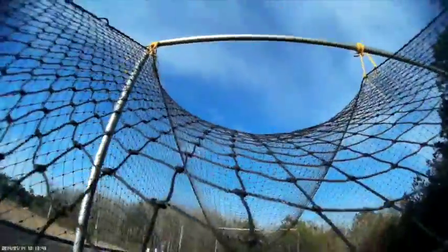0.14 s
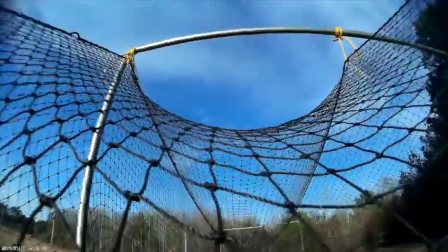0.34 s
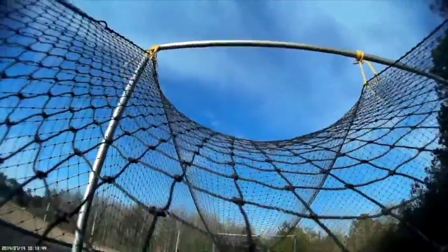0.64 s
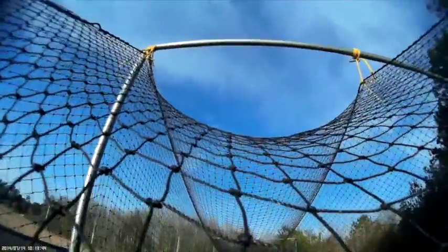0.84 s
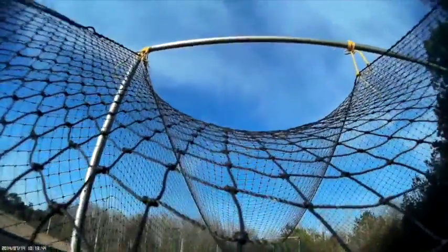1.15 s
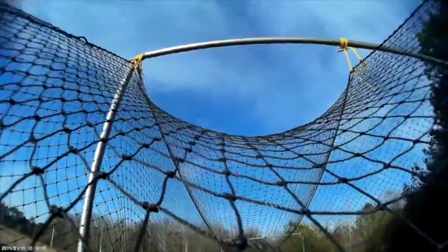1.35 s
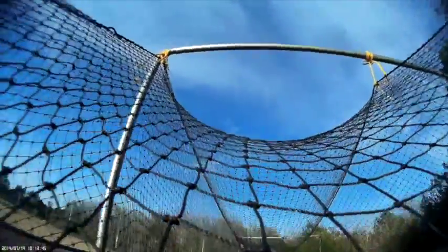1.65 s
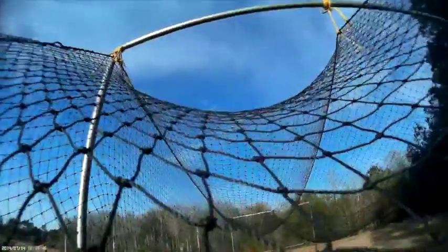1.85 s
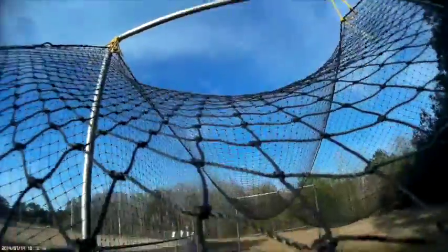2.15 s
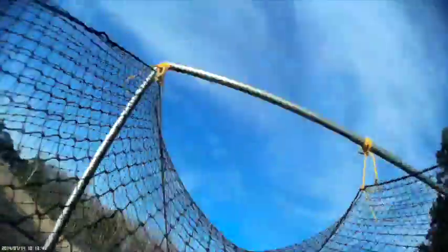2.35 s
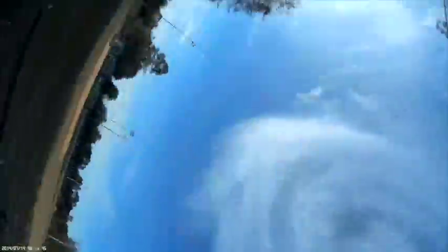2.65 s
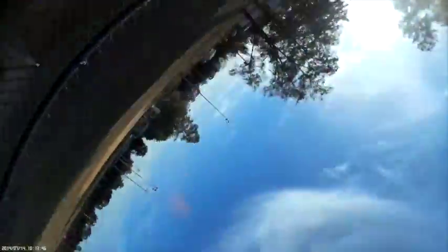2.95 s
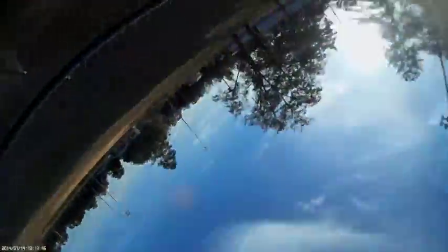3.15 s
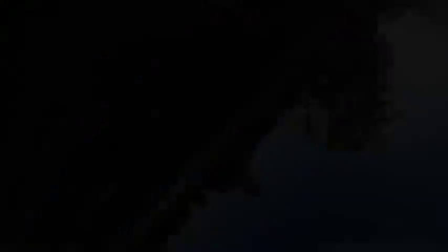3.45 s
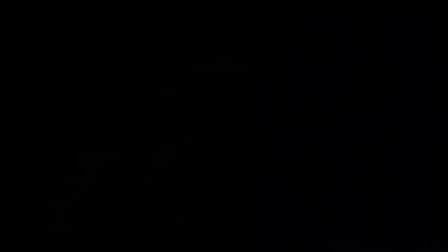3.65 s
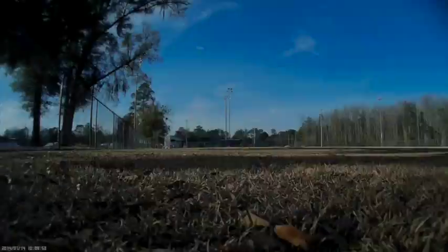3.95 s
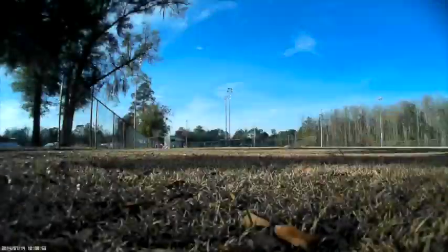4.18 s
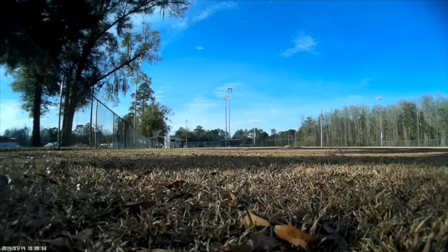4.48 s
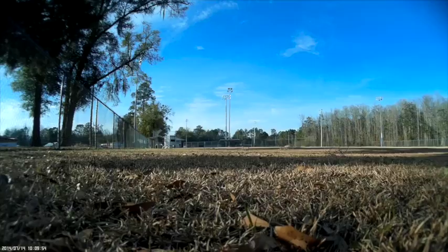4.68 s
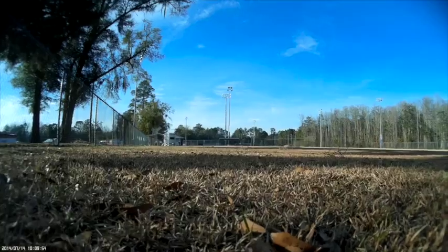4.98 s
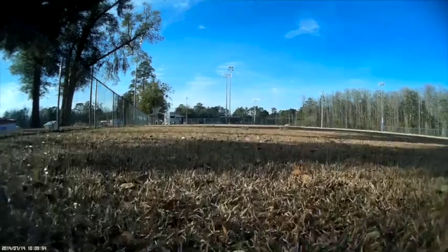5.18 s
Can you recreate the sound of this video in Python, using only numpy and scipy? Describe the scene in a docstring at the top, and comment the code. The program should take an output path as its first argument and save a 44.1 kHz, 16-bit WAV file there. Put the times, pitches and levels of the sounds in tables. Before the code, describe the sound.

Outdoors, heard from a microphone on a small drone: faint ticks and creaks on its frame, a quiet pause, then rough scraping, rattling and two very hard cracks as it is handled. Knocks thin out over wind and a distant low engine idle. Abruptly the motor controllers whistle with a stutter, and the propellers spin up into a beating buzz that is still climbing at the end.

```python
"""A small four-rotor drone with a camera, heard through the camera's microphone.
First it is fingered, scraped and knocked: noisy contact forces ring the modes of its frame, and rubs creak on
single resonances. Then a distant engine idles, pulses through a resonant pipe, with wind noise on the microphone.
Last the speed controllers whistle, a switching tone with sidebands, and the propellers spin up: two rotor pairs
whose blade tones beat, over overtones, hum, hiss and wash. Faint air noise lies under it all."""
import sys
import numpy as np
from scipy.fft import rfft, irfft, next_fast_len
from scipy.io import wavfile
from scipy.ndimage import map_coordinates

SR = 44100
rng = np.random.default_rng(int(sys.argv[2]) if len(sys.argv) > 2 else 0)


def materialize(psi):
    """Save the field psi as 16-bit PCM at rate SR to the path in sys.argv[1].

    A 1-D psi becomes a single channel; in a 2-D psi each row is a channel.
    """
    bounded = np.clip(np.atleast_2d(psi).T, -1, 1)
    quanta = np.round(bounded * 32767).astype(np.int16)
    wavfile.write(sys.argv[1], SR, quanta)


N = 234548

# scraping force, light until the frame is seized and tumbles:
# [t/s, relative pressure level/dB, relative treble grit level/dB]
SCRAPE_FORCE = [(0.0, -90, -106), (0.15, -72, -68.5), (0.4, -57, -67.5), (0.55, -66.5, -95),
                (0.88, -60.5, -69.5), (1.1, -60, -67), (1.69, -59.5, -70), (1.705, -38.5, -55),
                (2.0, -40.5, -48.5), (2.35, -42.5, -51.5), (2.47, -48.5, -53.5), (2.7, -39.5, -47),
                (3.03, -32.5, -54), (3.09, -36.5, -64), (3.3, -54, -70.5), (3.7, -50.5, -61.5),
                (4.1, -55, -67)]
ARMED = 4.476  # s, controllers switch on


def amp(db):
    """Decibel law: the amplitude gain of a level in dB."""
    return 10 ** (np.asarray(db) / 20)


def unit(x):
    """Normalization: x at rms 1."""
    return x / np.sqrt(np.mean(x ** 2) + 1e-20)


def curves(rows):
    """Linear interpolation in time: one value per sample for each column after the time."""
    s, *cols = np.transpose(rows)
    return [np.interp(np.arange(N) / SR, s, c) for c in cols]


def wobble(rate):
    """Band-limited fluctuation: a smooth random curve with rate knots a second."""
    knots = rng.standard_normal(int(N * rate / SR) + 4)
    return map_coordinates(knots, [np.arange(N) * rate / SR])


def filtered(x, response):
    """Linear filtering: the spectrum of x times a complex response of frequency."""
    m = next_fast_len(N + SR // 2)
    return irfft(rfft(x, m) * response(np.fft.rfftfreq(m, 1 / SR)), m)[..., :N]


def noise(spectrum):
    """Spectral shaping: white noise coloured by (f/Hz, level/dB) points, at rms 1."""
    f, db = np.transpose(spectrum)

    def colour(hz):
        return amp(np.interp(np.log(hz + 1), np.log(f + 1), db))

    return unit(filtered(rng.standard_normal(N), colour))


def gate(start, end, edge):
    """Linear envelope: up over edge seconds from start, down over edge seconds from end."""
    return np.interp(np.arange(N) / SR, [start, start + edge, end, end + edge], [0, 1, 1, 0])


def resonance(f, centre, width):
    """Damped oscillator: band-pass response with gain 1 at its centre."""
    return 1j * f * width / (centre * centre - f * f + 1j * f * width)


def frame(force, low_hz=None, high_hz=None, deep_db=-9):
    """Modal superposition: low, middle and high force parts ring modes, favoured near the two pitches."""
    # resonances of frame and camera shell: [f/Hz, width/Hz, relative level/dB]
    frame_modes = [(113, 120, -13.5), (220, 79, -9), (304, 15.5, -8), (824, 98.5, 0.5), (1269.5, 50.5, 1.5),
                   (1518, 94, 3.5), (1932, 510, -5.5), (2525, 72, -6), (2740, 99, -12.5), (3226, 240, -10),
                   (3750, 516, -12), (4563, 357, -10), (5600, 290, -15.5), (6064, 396, -18),
                   (7710, 240, -26), (9370, 360, -27.5), (12400, 180, -38), (12700, 570, -50.5)]
    m = next_fast_len(force.shape[1] + SR // 10)
    f = np.fft.rfftfreq(m, 1 / SR)
    centre, width, db = np.transpose(frame_modes)[:, :, None]
    db = db + deep_db * (centre < 260)  # the slow bending modes need a hard blow
    if low_hz:
        db = db + 9 * sum(np.exp(-(np.log(centre / hz) / 0.088) ** 2) for hz in (low_hz, high_hz))
    signs = (-1.) ** np.arange(len(centre))[:, None]
    modes = (signs * amp(db) * resonance(f, centre, width)).sum(0)
    low = 1 / (1 + 1j * f / 1000) ** 2
    middle = (1j * f / 1000) ** 2 * low / (1 + 1j * f / 3500) ** 2
    high = (1j * f / 3500 / (1 + 1j * f / 3500)) ** 3 / (1 + 1j * f / 11000) ** 2
    parts = modes * np.array([low, middle, high])
    parts = parts / np.sqrt(np.mean(np.abs(parts) ** 2, axis=1, keepdims=True))
    return irfft((rfft(force, m) * parts).sum(0), m)


def knocks():
    """Impact excitation: a crack and dying rattle of force; hard blows excite the deep modes more."""
    # knocks and ticks: [t/s, relative level/dB, relative thud level below 1 kHz/dB,
    # relative snap level above 3.5 kHz/dB, contact t60/s, most excited f/Hz]
    blows = [(0.1759, -51, 4, -6, 0.055, 1340), (0.3413, -27, -15, -3.5, 0.047, 1460),
             (0.379, -31.5, -12.5, -9.5, 0.044, 1740), (0.4923, -39, -18, -7.5, 0.04, 1530),
             (0.5156, -35.5, 0, -0.5, 0.033, 757), (0.7108, -44.5, -13, -5, 0.033, 614),
             (1.478, -48, -5, 6, 0.011, 796), (1.702, -29, -3, -2.5, 0.12, 1720),
             (1.7606, -20, -2, -4.5, 0.021, 1240), (1.8023, -13.5, -16.5, -6.5, 0.026, 825),
             (1.8356, -27.5, -18, -2.5, 0.044, 1400), (1.8562, -17.5, -19, -11.5, 0.026, 1470),
             (1.9038, -24, -19, -21.5, 0.014, 1530), (1.9953, -21.5, 0, -5, 0.075, 950),
             (2.0206, -25.5, -1, -8, 0.044, 820), (2.0624, -28.5, -6, -3.5, 0.06, 940),
             (2.173, -27.5, -13, -21.5, 0.011, 1430), (2.2047, -23.5, -14, -10.5, 0.042, 1360),
             (2.217, -27, -16.5, -4, 0.017, 840), (2.2562, -19, -39, -12.5, 0.03, 1270),
             (2.3248, -21, -11, -8, 0.17, 795), (2.3487, -20.5, -1, -22.5, 0.066, 1270),
             (2.3844, -21.5, -13, -7, 0.082, 724), (2.4209, -25.5, -30, -1, 0.022, 1830),
             (2.4417, -21.5, -12, -32.5, 0.013, 1370), (2.4853, -27.5, -5.5, -11, 0.077, 720),
             (2.5621, 1.5, -11, -2.5, 0.014, 1748), (2.565, -30.5, 11.5, -15, 0.052, 300.6),
             (2.6789, -23, -6, -11, 0.07, 790), (2.7616, -25, -14, -0.5, 0.029, 1730),
             (2.7789, -19, -23, -6, 0.15, 1660), (2.802, -8.5, -10.5, -9.5, 0.065, 840),
             (2.8175, -18.5, -5, -8.5, 0.14, 1090), (2.8973, 4, -10.5, -8.5, 0.032, 1590),
             (3.0767, -31, -0.5, 1, 0.02, 1670), (3.0879, -35, 11, 0, 0.034, 1100),
             (3.1642, -25, -35, -16.5, 0.039, 1570), (3.372, -45, -25, -13, 0.025, 1560),
             (3.4252, -45, 7, 6.5, 0.015, 950), (3.5024, -44, -2.5, -2, 0.15, 1530),
             (3.6026, -28.5, -11.5, -5.5, 0.089, 1200), (3.694, -30.5, -11, -11, 0.034, 1660),
             (3.8097, -24, -12.5, -5, 0.018, 1160), (3.8864, -19, -15, -3.5, 0.016, 1330),
             (3.9843, -37.5, -13, -25, 0.033, 1610)]
    out, t = np.zeros(N + SR), np.arange(SR // 8) / SR
    contacts = blows + patter()
    rattle = rng.standard_normal((len(contacts), len(t)))
    upper_hz = rng.uniform(2210, 4640, len(contacts))  # upper pitch that a contact favours
    for (s, db, thud_db, snap_db, t60, low_hz), high_hz, grit in zip(contacts, upper_hz, rattle):
        decay = amp(db - 60 * t / max(t60, .003))
        onset = 1 - np.exp(-t / (0.035 * t60))
        crack = 1 + 1.12 * np.exp(-t / 0.00064)
        force = grit * decay * onset * crack * amp([[thud_db + 8.5], [0], [snap_db + 1.5]])
        ring = frame(force, low_hz, high_hz, deep_db=0.67 * (db + thud_db) + 3.5)
        out[round(s * SR):][:len(ring)] += ring
    return out[:N]


def patter():
    """Random point process: small stray contacts that follow the scraping pressure, as rows for knocks."""
    # [level over the scraping pressure/dB, relative thud level/dB, relative snap level/dB, contact t60/s]
    stray_touch = (9.5, -11, -8.5, 0.1)
    span_s, per_s = 4, 8
    s, size, spot = rng.random((round(span_s * per_s), 3)).T
    s = span_s * s
    over_db, *touch = stray_touch
    db = curves(SCRAPE_FORCE)[0][(s * SR).astype(int)] + over_db + 8 * (size - .5)
    return [(a, b, *touch, 780 * 3.1 ** c) for a, b, c in zip(s, db, spot)]


def scraping():
    """Stick and slip: uneven clumps of grit, low and high parts loosely tied, with sparse treble ticks."""
    pressure_db, bright_db = curves(SCRAPE_FORCE)
    depth = np.clip((pressure_db + 75) / 25, .3, 1)  # a light touch slides smoothly
    shared = wobble(30) + 1.2 * wobble(14)
    clumps = [amp(depth * (2 * shared + 2 * wobble(45) + 4 * wobble(300))) for _ in range(3)]
    ticks = (rng.random(N) < 300 / SR) * rng.standard_normal(N)  # about 300 a second
    thud, rub = (unit(c * rng.standard_normal(N)) for c in clumps[:2])
    grit = unit(clumps[2] * (rng.standard_normal(N) + 14 * ticks))
    force = np.array([thud * amp(pressure_db), rub * amp(pressure_db - 20.0), grit * amp(bright_db)])
    return frame(force)[:N] * gate(-1, 3.983, 0.11)


def creaks():
    """Frictional resonance: a rub settles on one mode, narrow noise that swells quickly and rings out."""
    # creaks and squeaks: [start t/s, t of decay to 1/e/s, f/Hz, width/Hz, relative level/dB]
    squeaks = [(0.208, 0.238, 816, 80, -55), (0.35, 0.457, 1527, 50, -60), (0.446, 0.488, 800, 80, -53.5),
               (0.522, 0.561, 1543, 50, -50), (0.826, 0.89, 710, 80, -44.5),
               (0.82, 0.892, 1060, 130, -49.5), (0.921, 1.06, 730, 60, -62), (0.941, 1.1, 1186, 60, -59),
               (0.879, 1.175, 3760, 300, -68), (1.578, 1.69, 3880, 400, -66),
               (0.827, 0.923, 5800, 300, -68), (1.757, 1.778, 2702, 30, -43),
               (1.99, 2.033, 2710, 30, -48.5), (2.947, 3.036, 4540, 180, -43),
               (3.083, 3.1, 4395, 150, -28.5), (3.095, 3.12, 2700, 30, -59), (3.494, 3.521, 4450, 150, -49),
               (3.506, 3.53, 6060, 200, -61)]
    out = np.zeros(N + SR)
    for start, end, hz, width, db in squeaks:
        m = next_fast_len(round(3 * (end - start) * SR))
        f = np.fft.rfftfreq(m, 1 / SR)
        u = np.arange(m) / SR / (end - start)
        band = (1 + ((f - hz) / (width / 2)) ** 2) ** -.85
        tone = unit(irfft(rfft(rng.standard_normal(m)) * band, m))
        swell = (1 - np.exp(-(u / 0.34) ** 2)) * np.exp(-u ** 2)
        out[round(start * SR):][:m] += amp(db + 4.5) * tone * swell
    return out[:N]


def motors():
    """Beats and modulation: rotor pairs of unequal phase, a switching tone with sidebands, hiss and wash."""
    # rotors: [t/s, blade rate f/Hz, lead of the far pair over the near/blade passes]
    rotors = [(4.48, 0, -1.5), (4.53, 56, -1), (4.6, 103, -0.5), (4.65, 151, 0.1), (4.7, 196, 0.5),
              (4.785, 234, 1.5), (4.866, 247.5, 2.5), (4.94, 256.5, 3), (5.04, 270, 3.5),
              (5.11, 297.5, 3.5), (5.155, 314, 4), (5.19, 312, 4), (5.25, 337, 4), (5.319, 350, 4)]
    # blade overtones: [multiple of blade rate, relative level/dB]
    overtones = [(3, -8), (4, -11.5), (5, -13.5), (6, -16), (7, -20), (8, -30)]
    # commutation lines: [multiple of switching rate, multiple of blade rate]
    sidebands = [(1, 6), (1, 21), (1, -21), (0, 21), (2, -21), (1, 10.5), (0, 13)]
    # the same lines, ahead of the shell's response: [relative level/dB, level change/(dB/s)]
    sideband_levels = [(-28, -59), (-39.5, -3.5), (-36.5, -48), (-46.5, 6.5), (-39, -39), (-41.5, -16),
                       (-43, 1)]
    # hum of the powered windings at fixed pitches: [f/Hz, mid level/dB]
    winding_hum = [(1403, -39.5), (1105, -47)]
    # hiss spectrum, also the shell's resonances: [f/Hz, relative level/dB]
    hiss_spectrum = [(1350, -44), (2300, -20.5), (2900, -34), (4000, -5.5), (4640, -7), (5120, -14.5),
                     (5900, -7.5), (6970, -22), (7500, -3), (8350, -19.5), (8700, -16.5), (10700, -20),
                     (11700, -14.5), (14500, -42.5)]
    # propeller wash spectrum: [f/Hz, relative level/dB]
    wash_spectrum = [(18, -37), (30, 9), (224, -4), (279, -16), (450, -16), (572, -12.5), (657, -10.5),
                     (1430, -1), (2130, -14), (3500, -18.5), (4550, -19), (7700, -120)]
    # layers that grow with speed: [level at cruise/dB, rise per octave of speed/dB,
    # level at rest/dB, level of the jolt at switch-on/dB]
    tone_growth, overtone_growth = (-13, 14, -70, -70), (-25.5, 16.5, -70, -70)
    hiss_growth, wash_growth = (-40, 35, -36, -17.5), (-26, 13.5, -37, -21.5)
    weak_pair = 0.74  # gain of the farther pair over the nearer
    switch_hz = 7572
    whistle_settled_db, surge_db, surge_s = -22, 11, 0.11  # louder at first, decaying with this time constant
    stutter_db, stutter_s, step_s, first_step = 17, .125, .046, 4.496  # gap depth, duration, period, first gap

    blade_hz, lead = curves(rotors)
    t = np.arange(N) / SR
    since = np.abs(t - ARMED)
    turns = 2 * np.pi * np.cumsum(blade_hz) / SR
    near, far = turns - np.pi * lead, turns + np.pi * lead

    def beat(k):
        return np.sqrt(2) * (np.sin(k * near) + weak_pair * np.sin(k * far)) / (1 + weak_pair)

    jitter = .15 * np.array([wobble(25) for _ in range(4)])
    each = np.array([near, near, far, far]) + jitter + rng.uniform(0, 7, (4, 1))
    chopped = each + .2 * np.array([wobble(70) for _ in range(4)])  # the blades cut unsteady air
    upper = sum(amp(db) * np.sin(k * chopped).sum(0) / np.sqrt(2) for k, db in overtones)
    blades = grows(tone_growth, blade_hz) * beat(1)
    blades = blades + grows(overtone_growth, blade_hz) * (beat(2) + upper)

    # start-up steps cut gaps in the whistle
    steps = np.cos(np.pi * (t - first_step) / step_s) ** 4 * np.exp(-(since / stutter_s) ** 12)
    whistle_db = whistle_settled_db + surge_db * np.exp(-since / surge_s) - stutter_db * steps
    clock = 2 * np.pi * switch_hz * t + 1.3 * wobble(40)  # the switching phase wanders
    flutter = unit(amp(1.5 * wobble(45) + 2.85 * wobble(150)))
    whistle = amp(whistle_db) * np.sqrt(2) * flutter * np.sin(clock)

    lines = sum(amp(db + fade * since + 3.8 * wobble(50)) * np.sin(m * clock + k * each).sum(0)
                for (m, k), (db, fade) in zip(sidebands, sideband_levels))
    f, shell_db = np.transpose(hiss_spectrum)

    def shell(hz):
        floor_db = -15 - hz / 1100
        return amp(0.9 * (np.maximum(np.interp(hz, f, shell_db), floor_db) + 8.5))

    lines = filtered(lines, shell)  # loudest on the shell's resonances
    hum = sum(amp(db + 5.7 * wobble(30)) * np.sin(2 * np.pi * hz * t) for hz, db in winding_hum)
    hiss = grows(hiss_growth, blade_hz) * amp(1.0 * wobble(67)) * noise(hiss_spectrum)
    wash = grows(wash_growth, blade_hz) * amp(1.8 * wobble(40)) * noise(wash_spectrum)
    return (blades + whistle + lines + hum + hiss + wash) * gate(ARMED, 9, 0.0013)


def grows(layer, blade_hz):
    """Power law of speed: parts for speed, rest and the switch-on jolt, added as powers to one gain."""
    cruise_hz, jolt_t60 = 250, 0.12  # blade rate of the cruise level; decay in s
    cruise_db, per_octave, rest_db, jolt_db = layer
    since = np.abs(np.arange(N) / SR - ARMED)
    speed_db = cruise_db + per_octave * np.log2(blade_hz / cruise_hz + 1e-3)
    parts = [speed_db, rest_db + 0 * since, jolt_db - 60 * since / jolt_t60]
    return np.linalg.norm(amp(parts), axis=0)


def engine():
    """Pulse excitation of a resonator: three unequal firings a cycle thump through the exhaust."""
    # low idle of a distant engine: [t/s, level/dB]
    idle_level = [(3.3, -57.5), (3.5, -44.5), (3.8, -34), (4.1, -31), (4.5, -33), (4.9, -44)]
    # firings: [share of the cycle, relative mean level/dB]
    firings = [(0, 0), (0.331, -4.5), (0.671, -3.5)]
    # exhaust resonances: [f/Hz, width/Hz, relative level/dB]
    exhaust = [(47.3, 25.4, -8.5), (97.4, 14, 4), (227.4, 19, -9)]
    cycle_hz = 8.04
    cycles = 4.092 + np.arange(-7, 9)[:, None] / cycle_hz  # start times, s
    share, db = np.transpose(firings)
    late = rng.normal(0, 0.0031, (len(cycles), len(db)))  # s
    places = np.round((cycles + share / cycle_hz + late) * SR).astype(int)
    pulses = np.zeros(N)
    pulses[places] = amp(db + rng.normal(0, 2.4, (len(cycles), len(db))))

    def pipe(f):
        modes = sum((-1) ** k * amp(g) * resonance(f, c, w) for k, (c, w, g) in enumerate(exhaust))
        return modes / (1 + 1j * f / 700) ** 2

    thumps = filtered(pulses, pipe)
    running = len(cycles) / cycle_hz * SR / N  # share of the time that holds firings
    return amp(curves(idle_level)[0]) * unit(thumps) * np.sqrt(running)


def outdoors():
    """Turbulence noise: lumpy wind on the microphone port, still air, and a brief faint harmonic buzz."""
    # wind on the microphone: [t/s, level/dB]
    wind_level = [(0.0, -69), (0.4, -60.5), (1.1, -71), (1.85, -54.5), (2.13, -63), (2.79, -44),
                  (3.3, -59.5), (3.7, -40.5), (4.4, -36), (5.32, -37.5)]
    # wind and air spectra: [f/Hz, relative level/dB]
    buffet_spectrum, air_spectrum = [(12, -42), (25, -13), (100, -3), (177, -14.5), (368, -16),
                                     (706, -27.5), (850, -20), (1060, -37), (1600, -35), (2600, -57.5),
                                     (5700, -120)], [(12, -43), (20, 10.5), (167, -5.5), (644, -5),
                                                     (803, -13.5), (1090, -9), (1210, -12.5), (2780, -24),
                                                     (3760, -22.5), (6700, -24), (12300, -26), (14500, -38)]
    air_db = -61.5
    buzz_hz, buzz_db = 661, -77  # fundamental, level at the peak
    buzz_top_hz, buzz_slope = 9820, 3  # loudest near; loss in dB per kHz squared
    wind = amp(curves(wind_level)[0]) * unit(amp(0.83 * wobble(21.91)) * noise(buffet_spectrum))
    t = np.arange(N) / SR
    buzz = np.zeros(N)
    for hz in buzz_hz * np.arange(13, 19):
        db = buzz_db - buzz_slope * ((hz - buzz_top_hz) / 1e3) ** 2 + 3.9 * wobble(180)
        buzz += amp(db) * np.sqrt(2) * np.sin(2 * np.pi * hz * t)
    return wind + amp(air_db) * noise(air_spectrum) + buzz * gate(4.09, 4.305, 0.0066)


def scene():
    """Linear superposition: everything reaches the one microphone through air or frame."""
    return (knocks() + scraping() + creaks() + outdoors() + engine() + motors())[None]


def record(dry):
    """Saturation and band limit: the input clips near half scale, dulls towards the top and stops there."""
    top_hz = 14700
    clipped = dry / (1 + np.abs(dry / 0.45) ** 8) ** (1 / 8)
    return filtered(clipped, lambda hz: (hz < top_hz) / (1 + (hz / 13900) ** 14))


dry = scene()
out = record(dry)
materialize(out)
```